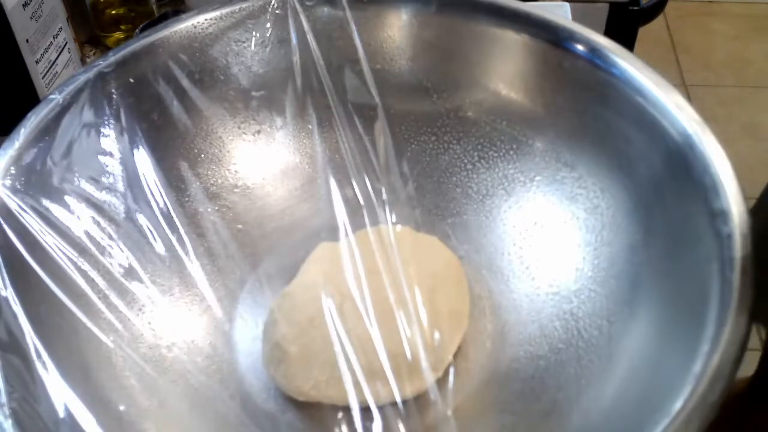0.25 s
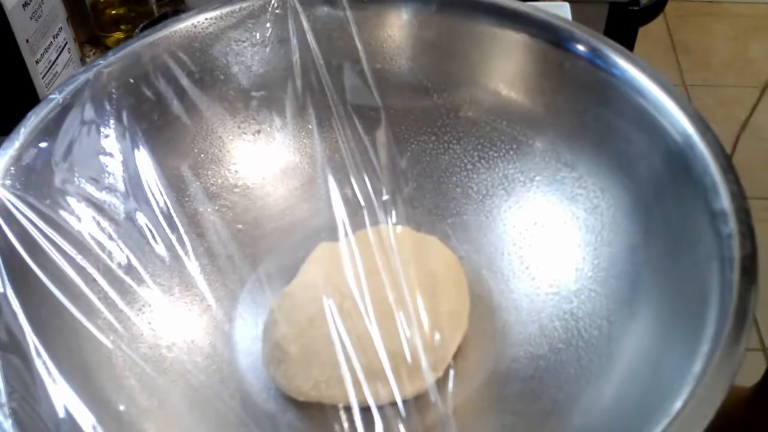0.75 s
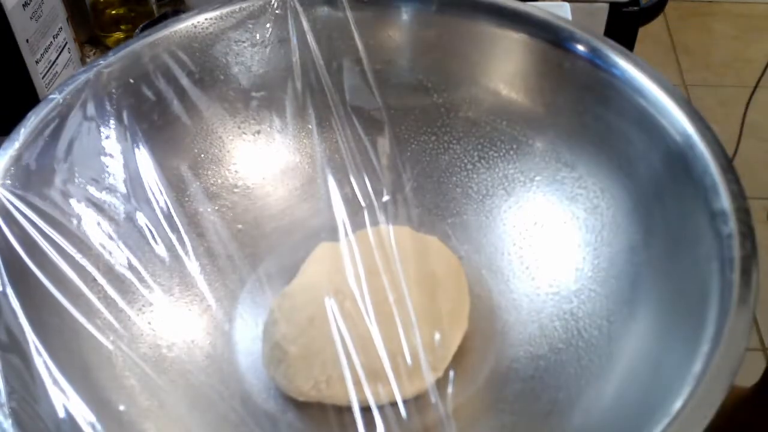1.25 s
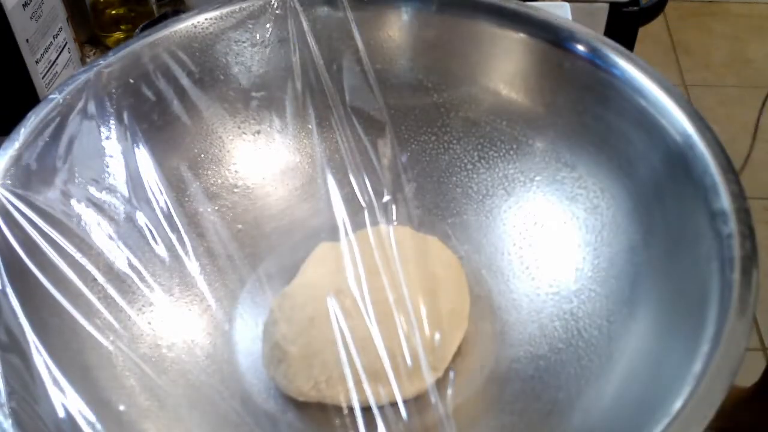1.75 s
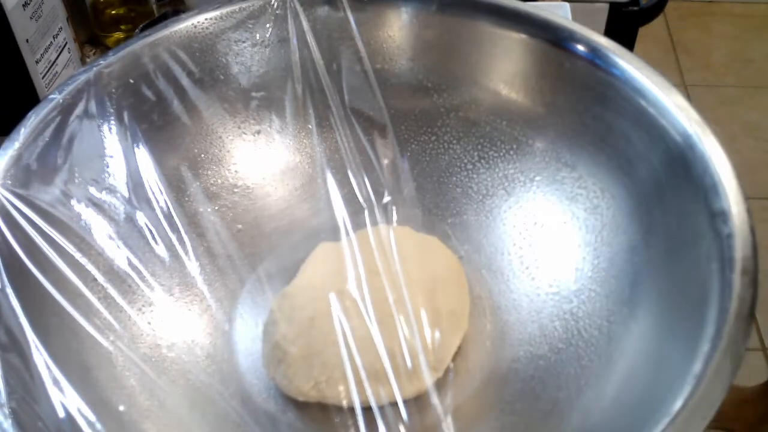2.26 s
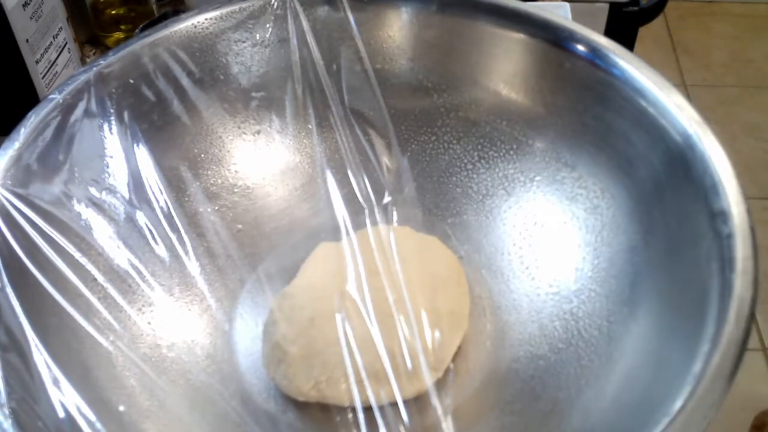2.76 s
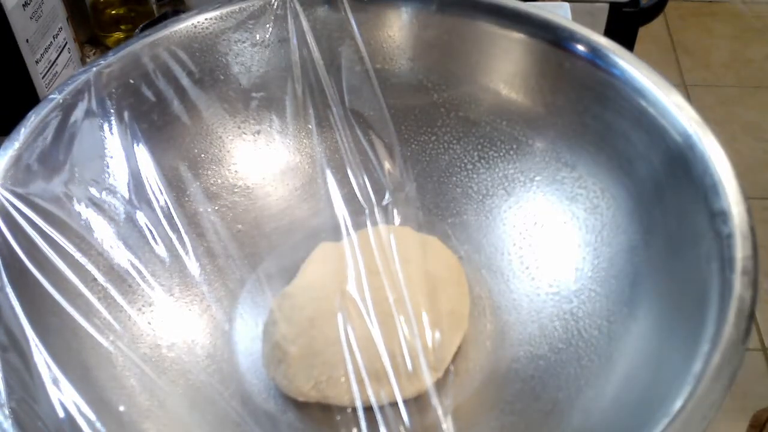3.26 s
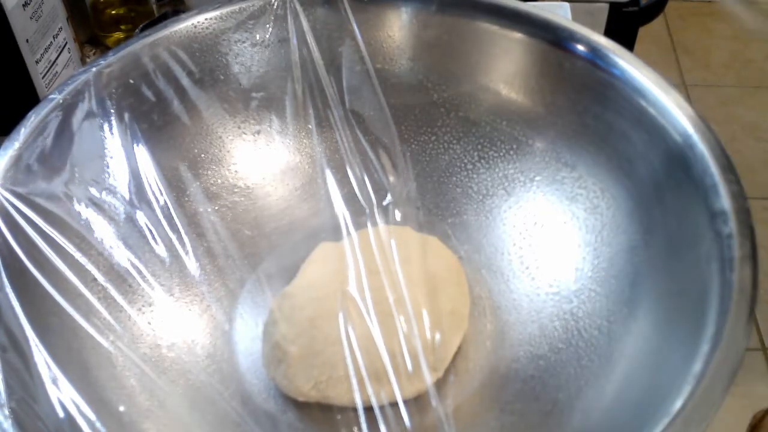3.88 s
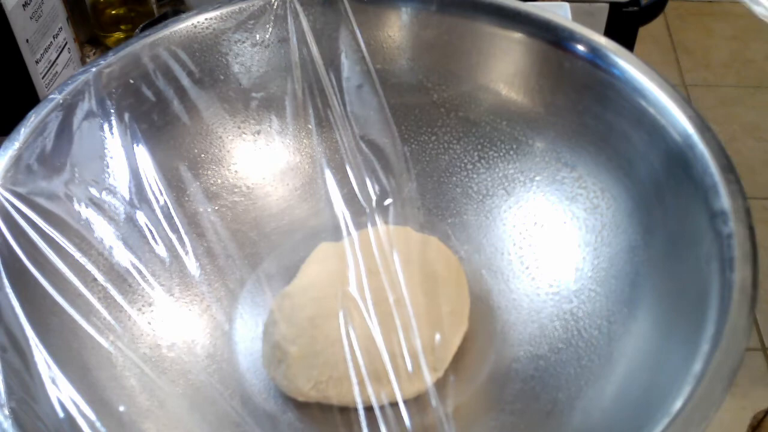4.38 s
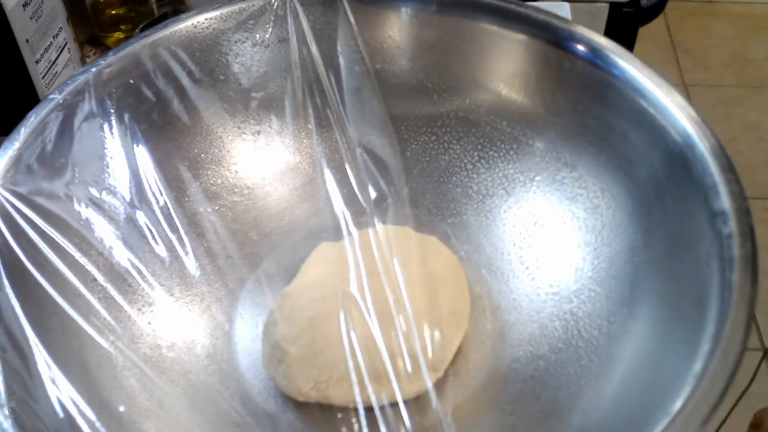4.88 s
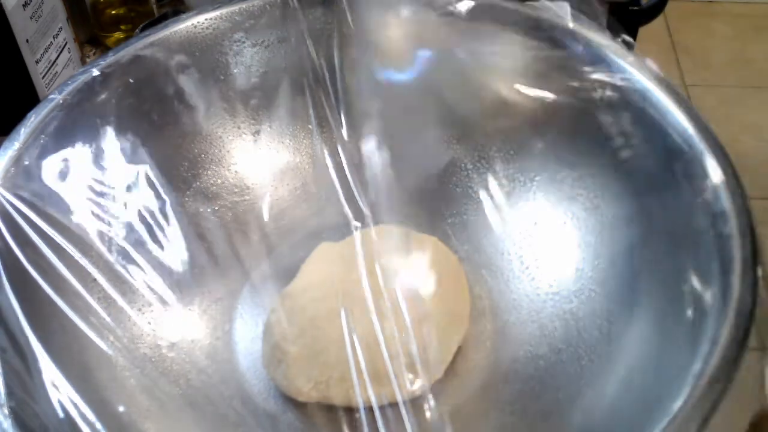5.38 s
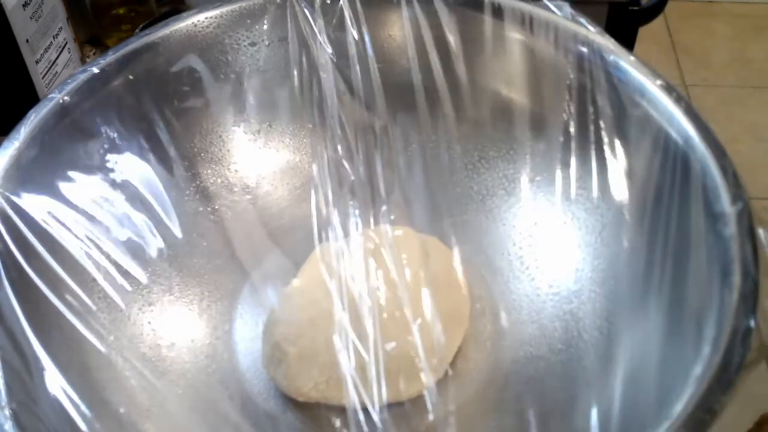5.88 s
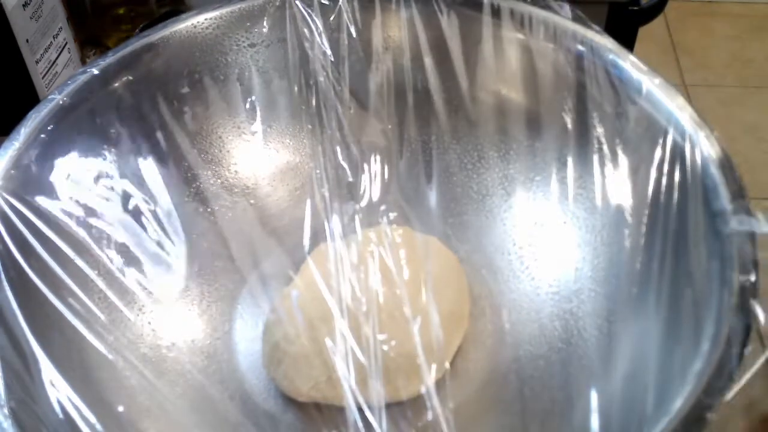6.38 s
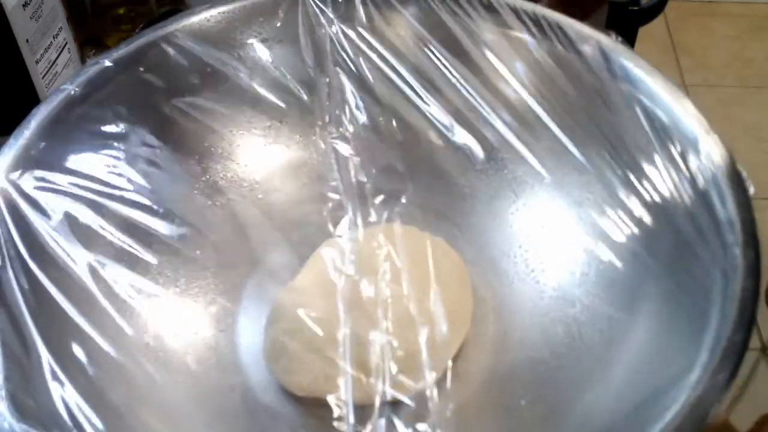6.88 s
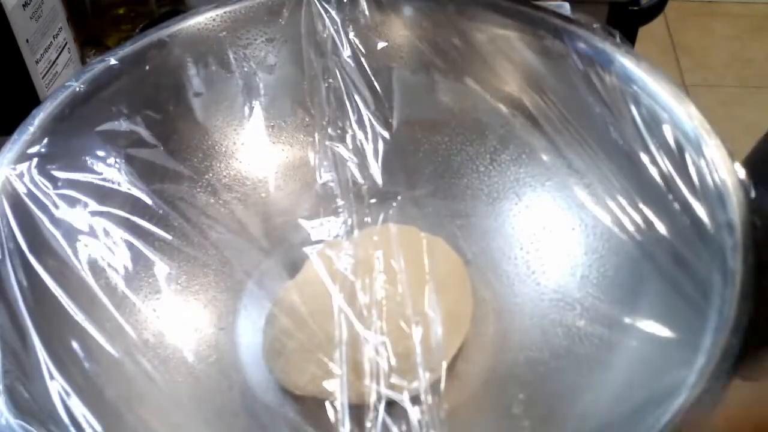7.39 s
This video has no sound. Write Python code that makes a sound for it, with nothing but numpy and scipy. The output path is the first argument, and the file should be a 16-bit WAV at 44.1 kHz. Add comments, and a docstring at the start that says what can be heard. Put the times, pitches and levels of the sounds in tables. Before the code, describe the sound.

A quiet kitchen with faint low rumble, hiss and appliance hum, heard on the left channel only, with a close microphone and a short room tail. Around 0.5 s, plastic film begins to rustle, and soft hollow finger knocks sound on the covered metal bowl until about 1.45 s. Crinkling thickens, and from 1.35 to 1.95 s sharp snaps crowd together, loudest near 1.6 and 1.8 s, with taut drumming and a slight steel ring. It thins to scattered ticks and light rustle from 2 to 3 s. Crunches and snaps return at 3.5-3.75 s and 4.15-4.35 s with bowl taps and low air flutters. Sharp isolated crackles come at 5.1 and 5.4 s, then quieter rustling and thin sliding hisses. A burst at 6.4-6.6 s leads into soft low thuds around 6.8 s. Faint crinkling continues, with a final brisk rustle from 7.45 s.

```python
"""Cling film over a steel bowl

Cling film is pulled over a steel mixing bowl in a quiet kitchen, close to a microphone on the left channel only.
The film peels off the rim in sharp snaps: clicks with flutter that ring a facet and, when taut, the steel.
Flipping folds make it rustle, crunch under the fingers and drum as a sheet; slides hiss and wafts flutter.
Finger knocks ring the modes of the covered bowl, and near the end soft bumps ring its support.
Filtered noise and narrow bands make the kitchen; one echo and a decaying tail make the room."""
import sys
import numpy as np
from scipy import signal
from scipy.fft import rfft, irfft
from scipy.io import wavfile
from scipy.ndimage import uniform_filter1d

SR = 44100
rng = np.random.default_rng(int(sys.argv[2]) if len(sys.argv) > 2 else 0)


def generate_wav(sig):
    """Save sig (samples, or channels by samples) to the path in sys.argv[1] as 16-bit PCM at SR."""
    pcm = np.round(np.clip(np.atleast_2d(sig).T, -1, 1) * 32767).astype(np.int16)
    wavfile.write(sys.argv[1], SR, pcm)


N = 336483  # samples


def undb(db):
    """Logarithmic level: decibels to amplitude gain."""
    return 10 ** (np.asarray(db) / 20)


def level(x, db):
    """Mean power: scale a sound to an rms level."""
    return x * undb(db) / np.sqrt(np.mean(x ** 2))


def add(track, s, sound):
    """Superposition: mix a sound into a track at a time in seconds."""
    i = max(int(round(s * SR)), 0)
    track[i:i + len(sound)] += sound[:max(len(track) - i, 0)]


def curve(points):
    """Linear interpolation: a control of (time [s], value) points, sample by sample."""
    return np.interp(np.arange(N) / SR, *np.transpose(points))


def response(points, size=512, tilt_db=0):
    """Minimum phase: a causal unit-energy response to a spectrum, tilted in dB an octave above 1 kHz."""
    hz, db = np.transpose(points)
    octave = np.log2(np.maximum(np.fft.rfftfreq(size, 1 / SR), 1))
    spectrum_db = np.interp(octave, np.log2(hz), db) + tilt_db * np.maximum(octave, 10)
    cepstrum = irfft(np.log(undb(spectrum_db)))
    # folding the cepstrum forward makes the response causal
    cepstrum[1:size // 2] *= 2
    cepstrum[size // 2 + 1:] = 0
    h = irfft(np.exp(rfft(cepstrum)))
    return h / np.linalg.norm(h)


def colour(x, points, size=2048):
    """Linear filtering: pass a sound through a spectrum; rms 1."""
    return level(signal.fftconvolve(x, response(points, size=size))[:N], 0)


def resonate(x, hz, width_hz):
    """Simple resonance: one second-order peak with gain 1 at its centre."""
    hz = min(hz, .4 * SR)
    return signal.lfilter(*signal.iirpeak(hz, hz / width_hz, fs=SR), x)


def band(hz, width_hz, size=N):
    """Cascaded resonance: noise passed twice through the same peak for steeper skirts; rms 1."""
    once = resonate(rng.standard_normal(size), hz, width_hz)
    return level(resonate(once, hz, width_hz), 0)


def walk(rate):
    """Random modulation: smooth wandering with a spread near 1, renewed `rate` times a second."""
    k = int(SR / rate)
    steps = np.repeat(rng.standard_normal(N // k + 1), k)
    return level(uniform_filter1d(steps, k), 0)[:N]


def fade(t60, length_s):
    """Exponential decay: the amplitude falls 60 dB in t60 seconds."""
    return np.exp(-np.log(1000) * np.arange(int(length_s * SR)) / SR / t60)


def tail(t60):
    """Diffuse reverberation: half a second of decaying noise of unit energy."""
    envelope = fade(t60, .5)
    x = envelope * rng.standard_normal(len(envelope))
    return x / np.linalg.norm(x)


def swell(length_s, rise):
    """Power envelope: a rounded hump of height 1 that peaks after the share `rise` of its length."""
    share = np.linspace(0, 1, int(length_s * SR))
    return np.sqrt(np.interp(share, [0, np.clip(rise, .01, .99), 1], [0, 1, 0]))


def ring(modes, detune):
    """Modal superposition: decaying sines of a struck object; each blow shifts the modes slightly."""
    t = np.arange(SR // 2) / SR
    out = np.zeros(len(t))
    for hz, db, t60 in modes:
        shifted_hz = hz * (1 + detune * rng.standard_normal())
        out += undb(db) * fade(t60, .5) * np.sin(2 * np.pi * shifted_hz * t)
    return out


def folds(rate, spread_db, cap_db):
    """Crackling noise: folds flip at random, many weakly and a few strongly, with even mean power."""
    size = undb(np.minimum(spread_db * rng.exponential(size=N), cap_db))
    flips = rng.random(N) < rate / SR
    x = flips * size * rng.choice([-1, 1], N)
    return x / np.sqrt(np.abs(uniform_filter1d(x ** 2, size=2600)) + 1e-9)


# spectrum of the kitchen's rumble and hiss: (frequency [Hz], relative density [dB per Hz])
KITCHEN_COLOUR = [(10, -6), (22, 0), (43, -3), (65, -5), (130, -14), (270, -18), (500, -23), (1100, -28),
                  (1800, -33), (3200, -34), (5500, -35), (10000, -34), (16000, -39)]
# appliance hum: (frequency [Hz], width of each resonance pass [Hz], level [dB])
HUM = [(99.8, 4, -90.5), (189.5, 15.3, -77.5), (252, 9.2, -82), (899, 91, -83.5)]


def kitchen(air_db=-61.5, wander_db=1):
    """Stationary noise: low rumble and faint hiss wander in level beside the narrow hum of an appliance."""
    air = colour(rng.standard_normal(N), KITCHEN_COLOUR, size=8192)
    air = air * undb(air_db + wander_db * walk(3.2))
    return air + sum(undb(db) * band(hz, width) for hz, width, db in HUM)


# the hand tugs at the sheet and it wafts air: (time [s], length [s], peak of the rms level [dB])
WAFTS = [(0.606, 0.23, -56), (3.614, 0.34, -50), (4.2, 0.26, -48.5), (5.084, 0.17, -54), (7.43, 0.14, -54)]


def wafts():
    """Air displacement: the moving sheet pushes air at the microphone, a faint low flutter."""
    push = np.zeros(N)
    for s, length_s, db in WAFTS:
        add(push, s, undb(db) * swell(length_s, rise=0.22))
    # (frequency [Hz], relative density [dB per Hz])
    low = [(15, 4.5), (40, -3), (100, -15.5), (250, -16), (800, -38)]
    return push * colour(rng.standard_normal(N), low, size=8192)


# fingers knock on the covered bowl: (time [s], rms level of the first 25 ms [dB],
# frequency around which the contact excites it most [Hz], t60 of the finger's damping [s])
KNOCKS = [(.475, -49, 560, .1), (.53, -58, 400, .2), (.665, -50.5, 270, .25), (.901, -54, 950, .1),
          (.958, -41, 290, .22), (1.012, -52, 450, .08), (1.120, -51, 300, .1), (1.143, -48.5, 480, .15),
          (1.215, -48.5, 520, .06), (1.251, -42, 520, .25), (1.320, -45.5, 240, .1), (1.452, -52, 800, .1),
          (3.732, -55, 1150, .06), (4.185, -44.5, 1100, .15), (4.208, -48, 900, .1), (4.312, -55, 320, .1),
          (4.338, -54, 320, .07), (5.202, -60, 450, .02), (6.615, -57, 1000, .12)]
# modes of the bowl under its film, before contact and damping: (frequency [Hz], relative level [dB], t60 [s])
BOWL_MODES = [(140, -9, .06), (221, 3, .3), (300, -3, .12), (445, -4, .17), (505, -3, .12), (590, -6, .05),
              (692, 0, .17), (930, 1, .1), (1020, -4, .08), (1290, -9, .08)]
# soft bumps of the bowl on its support: (time [s], peak level [dB])
BUMPS = [(6.64, -40.5), (6.764, -28.5), (6.8137, -30), (6.868, -45)]
# modes of the support, before the band limit: (frequency [Hz], relative level [dB], t60 [s])
SUPPORT_MODES = [(103, 9, 0.032), (108.3, -11.5, 0.5), (200, 2, 0.056), (224, -22.5, 0.42),
                 (318, -3.5, 0.017), (437, -5, 0.037)]


def bowl(reach_db=7, scuff_db=-8, scuff_t60=0.057, bump_cut_hz=520):
    """Modal excitation: knocks ring the bowl most near their own pitch, scuffed and damped by the finger;
    bumps thud in its support."""
    out = np.zeros(N)
    # a soft fingertip takes a few ms to press in
    press = 1 - fade(.012, .5)
    for s, db, contact_hz, damping_t60 in KNOCKS:
        # modes weaken with the square of their distance from the contact in octaves
        excited = [(hz, gain - reach_db * np.log2(hz / contact_hz) ** 2, t60) for hz, gain, t60 in BOWL_MODES]
        knock = ring(excited, detune=.01)
        scuff = band(contact_hz, 0.68 * contact_hz, size=len(knock)) * fade(scuff_t60, .5)
        knock = (level(knock, 0) + level(scuff, scuff_db)) * press * fade(damping_t60, .5)
        add(out, s, undb(db) * knock / knock[:int(.025 * SR)].std())
    soft = signal.butter(4, [80, bump_cut_hz], "bandpass", fs=SR, output="sos")
    for s, db in BUMPS:
        thud = signal.sosfilt(soft, ring(SUPPORT_MODES, detune=.01))
        add(out, s, -undb(db) * thud / np.abs(thud).max())
    return out


# film sliding over the rim with a thin swish:
# (time [s], length [s], level at the hump before flicker [dB], centre frequency [Hz])
SLIDES = [(1.976, 0.27, -69, 1710), (3.151, .21, -72, 2330), (3.534, .29, -63.5, 2100),
          (5.237, .14, -69, 2530), (5.614, .15, -71, 2530), (5.807, 0.3, -71, 2670),
          (6.167, 0.19, -71, 2560), (6.543, 0.17, -67, 900), (6.965, .09, -71, 3740),
          (7.442, .19, -69, 2780), (7.433, 0.16, -68, 920)]


def slides(width_hz=700):
    """Friction noise: film dragged across steel hisses in a narrow band that flickers in level."""
    drag = np.zeros(N)
    for s, length_s, db, hz in SLIDES:
        hump = swell(length_s, rise=0.41)
        add(drag, s, undb(db) * hump * band(hz, min(width_hz, hz / 3), size=len(hump)))
    return drag * undb(2.5 * walk(120))


# spectrum of the crinkling: (frequency [Hz], relative density [dB per Hz])
CRINKLE_COLOUR = [(300, -30.5), (1000, -5.5), (1700, -16), (2800, -7), (4500, -7.5), (6500, -5.5),
                  (8400, -1.5), (11000, -1), (12800, -5), (14200, -10), (16000, -28)]


def crinkle(clicks, facet_width_hz=650):
    """Buckling: broad clicks with a short flutter, plus facets of many sizes that flip and take turns."""
    power = signal.fftconvolve(clicks ** 2, fade(.004, .01))[:N]
    flutter = level(np.sqrt(np.abs(power)) * rng.standard_normal(N), 0)
    broad = level(clicks + .7 * flutter, 0)
    facets = np.zeros(N)
    for hz in np.linspace(2000, 14500, 16):
        flips = folds(rate=150, spread_db=4, cap_db=18) * undb(3.5 * walk(16))
        facets += resonate(flips, hz * (1 + 0.012 * rng.standard_normal()), facet_width_hz)
    return colour(broad + level(facets, 0), CRINKLE_COLOUR)


# how hard the hands work the film: (time [s], level of its steady crinkling [dB])
HANDLING = [(0, -86), (.43, -83), (.66, -61.5), (1.1, -54.5), (1.57, -53.5), (1.82, -50.5), (2.15, -60),
            (2.64, -59), (2.82, -78.5), (3.2, -59), (3.46, -74), (3.68, -56.5), (4.0, -63), (4.3, -57),
            (4.6, -72), (5.04, -77), (5.18, -61), (5.8, -66), (6.17, -66.5), (6.6, -58), (6.88, -71.5),
            (7.22, -64.5), (7.33, -92), (7.43, -104), (7.46, -48), (7.63, -59.5)]
# handfuls of folds giving way under the fingers:
# (time [s], length [s], peak crinkle level [dB], peak sheet level before tautness [dB])
CRUNCHES = [(0.491, 0.12, -57.5, -57), (0.639, 0.076, -56.5, -56.5), (0.745, 0.1, -59.5, -56.5),
            (0.959, 0.064, -50, -53), (1.068, .11, -52, -55.5), (1.199, 0.073, -44, -49),
            (1.27, .08, -68, -55.5), (1.377, 0.083, -47, -54.5), (1.452, 0.024, -39.5, -56),
            (1.602, .11, -55, -55.5), (1.777, 0.18, -62, -55.5), (2.312, .04, -54, -77),
            (2.377, 0.1, -55, -80), (3.145, 0.34, -59.5, -62), (3.406, 0.037, -52.5, -89),
            (3.5, 0.14, -58, -67), (3.615, 0.056, -41.5, -50.5), (3.709, 0.056, -45.5, -54.5),
            (3.894, 0.043, -54, -70), (4.161, 0.091, -42.5, -49.5), (4.318, 0.1, -53.5, -67),
            (5.08, 0.14, -59.5, -67.5), (5.164, 0.015, -40.5, -72), (5.404, 0.019, -46.5, -62),
            (5.52, 0.093, -58, -81), (5.979, 0.093, -57, -87), (6.22, 0.093, -53, -64),
            (6.414, 0.085, -51.5, -67), (6.559, 0.042, -48, -61), (6.597, 0.049, -43, -57),
            (6.783, 0.054, -57, -57.5), (6.972, 0.05, -58.5, -69), (7.172, 0.12, -66.5, -71.5),
            (7.438, 0.024, -50.5, -56.5), (7.485, 0.046, -48, -73), (7.592, .02, -52, -65)]
# spectrum of the drumming sheet: (frequency [Hz], relative density [dB per Hz])
SHEET_COLOUR = [(40, -10), (120, -0.5), (250, 5.5), (420, 0.5), (650, 0), (790, -5.5), (950, -1),
                (1300, -7), (1650, -11), (2200, -10.5), (4000, -22), (9000, -79)]
# how taut the film is while it is pulled: (time [s], tautness [0-1])
TAUT = [(0, 0.2), (1.5, 0.1), (1.65, 0.1), (1.8, 0.9), (1.95, 0.7), (2.3, 0.03), (7.63, 0)]


def film(crunch_rise=0.24, sheet_below_crinkle_db=7.5, taut_drum_db=3):
    """Membrane radiation: folds crinkle in the treble and shake the stretched sheet; crunches crowd them."""
    work_db = curve(HANDLING)
    press, shake = np.zeros(N), np.zeros(N)
    for start, length_s, top_db, body_db in CRUNCHES:
        hump = swell(length_s, rise=crunch_rise)
        add(press, start, undb(top_db) * hump)
        add(shake, start, undb(body_db) * hump)
    clicks = folds(rate=800, spread_db=4.8, cap_db=21)
    treble = crinkle(clicks) * np.hypot(undb(work_db), press)
    # the stretched sheet answers in bass and middle, and evens out the single clicks
    drumming = colour(folds(rate=1500, spread_db=3, cap_db=10), SHEET_COLOUR)
    steady = undb(work_db - sheet_below_crinkle_db)
    # a taut sheet drums louder
    sheet = drumming * np.hypot(steady, shake) * undb(taut_drum_db * curve(TAUT))
    return treble + sheet


# the film peels along the rim in runs of small snaps: (time [s], length [s], typical energy of a snap [dB])
PEELS = [(1.372, 0.09, -22), (1.84, .05, -19), (1.95, 0.074, -24.5), (2.197, 0.045, -31.5),
         (3.004, .06, -30), (3.514, 0.12, -24.5), (3.311, 0.038, -30.5), (6.569, 0.056, -22)]


def slips(flutter=0.45, gap_s=.021, gap_scatter=.4, spread_db=4, tilt_db=0.9):
    """Stick and slip: each peel is a run of small snaps at uneven gaps; rows as in SNAPS."""
    rows = []
    for start, length_s, db in PEELS:
        pace, strength, bright = rng.standard_normal((3, 16))
        gaps = gap_s * np.exp(gap_scatter * pace)
        for s, k, b in zip(np.cumsum(gaps) - gaps[0], strength, bright):
            if s < length_s:
                rows.append((start + s, db + spread_db * k, flutter, tilt_db * b))
    return rows


# the loud or lone snaps of the film: (time [s], energy [dB],
# share of the push's energy in the flutter after the click [0-1, held to .05-.95], brightness [dB an octave])
SNAPS = [(.475, -31.5, .8, -3), (0.6453, -27.5, .3, -2), (0.9019, -17.5, 0.6, 0.5), (1.153, -15, 0.1, 5),
         (1.248, -14, .85, .3), (1.3594, -10, 0.16, 0.7), (1.406, -13.5, .1, 2), (1.453, -17, 0.5, -1),
         (1.472, -17, 0, 0), (1.6111, -6.5, .5, -1.6), (1.6531, -14, 0.5, -1), (1.666, -16, 0.3, -1),
         (1.679, -13.5, 0.1, -1), (1.6932, -9, 0.2, -1), (1.7096, -10, 0.2, -1.3), (1.7595, -12.5, 0.2, .2),
         (1.7798, -2, 0.16, -0.5), (1.7981, -18, .1, .4), (1.8093, -9.5, 0.42, -0.5), (1.8278, -9.5, 0, .6),
         (1.8602, -13, .2, 2), (1.8813, -16.5, 0.1, -0.5), (1.9004, -16, 0.1, -3.5),
         (1.9266, -10, 0.42, -1), (2.3213, -21, 0.2, -2.2), (2.4065, -21.5, 0.3, 4), (3.044, -29, .5, 1.5),
         (3.4935, -19, 0.14, 1.2), (3.593, -17.5, .3, 2), (3.601, -16.5, 0.51, -1.2),
         (3.6229, -6.5, .8, 0.5), (3.732, -10, .6, -.7), (4.1, -17.5, .4, 1.5), (4.154, -28, .3, 5),
         (4.1612, -12, .8, .9), (4.188, -11, 0.8, 1), (4.2066, -23, .6, -1.7), (4.234, -23, 0.4, -5),
         (4.3436, -28, .4, -4), (4.7598, -23.5, 0.15, -1.5), (4.8371, -25.5, 0.2, -1.5),
         (5.0664, -12.5, 0.2, 0.8), (5.1586, -22, .4, 1), (5.1631, -14.5, .5, 0.5), (5.168, -19.5, 0.75, 0),
         (5.4141, -13.5, 0.55, .2), (6.467, -19, .4, 0.7), (6.495, -19.5, .4, 2), (6.5224, -21, .4, 0),
         (6.6056, -14, 0.65, -.1)]
# spectrum of a snap before its brightness: (frequency [Hz], relative density [dB per Hz])
SNAP_COLOUR = [(100, -21.5), (500, -9.5), (950, -9.5), (1500, -13), (2400, -12), (3500, -9), (5800, -4),
               (6800, -4.5), (8500, -2), (11300, 1.5), (13000, -0.5), (15500, -16)]
# the steel rim, shaken by snaps through the taut film:
# (frequency [Hz], width of each resonance pass [Hz], relative level [dB], t60 [s])
RIM = [(1040, 160, -25, .25), (1640, 260, -24, .35), (4500, 500, -21, .12), (5750, 800, -14, .15)]


def snaps(facet_hz=9270, facet_db=3, facet_width_hz=700, rim_db=1.5):
    """Impulsive release: film letting go of the rim clicks, flutters a few ms and rings the flipped facet."""
    out = np.zeros(N)
    chance = rng.standard_normal((160, 1024))
    for (s, db, share, tilt_db), (facet, *noise) in zip(SNAPS + slips(), chance):
        share = np.clip(share, .05, .95)
        flutter = fade(.008, .02)
        flutter = flutter * noise[:len(flutter)]
        push = np.sqrt(share) * flutter / np.linalg.norm(flutter)
        push[0] += np.sqrt(1 - share)  # the click
        snap = signal.fftconvolve(push, response(SNAP_COLOUR, tilt_db=tilt_db))
        snap = snap + undb(facet_db) * resonate(snap, facet_hz * np.exp(0.12 * facet), facet_width_hz)
        add(out, s, undb(db) * snap / np.linalg.norm(snap))
    # a taut film passes the jolt on to the steel, whose modes lie in close clusters
    jolt = out * curve(TAUT) * undb(rim_db)
    steel = 0
    for hz, width, db, t60 in RIM:
        cluster = resonate(resonate(tail(t60), hz, width), hz, width)
        # make up for the energy a narrow band loses
        steel = steel + undb(db) * np.sqrt(SR / width / 2) * cluster
    return out + signal.fftconvolve(jolt, steel)[:N]


def scene(echo_s=.0059, echo_db=-19.5, room_t60_s=0.32, room_db=-11.5):
    """Early and late reflection: the handling, one echo from a nearby surface, a short room tail, the kitchen."""
    direct = snaps() + film() + slides() + bowl()
    out = direct + wafts() + kitchen()
    add(out, echo_s, undb(echo_db) * direct)
    room = signal.fftconvolve(direct, tail(room_t60_s))[:N]
    add(out, echo_s, undb(room_db) * room)
    return np.array([out, np.zeros(N)])


def record(dry, top_hz=16000, offset=.0077):
    """Band limiting: the top is cut steeply; only the left input is live, and it sits slightly off zero."""
    top_cut = signal.ellip(8, .2, 70, top_hz, fs=SR, output="sos")
    return signal.sosfilt(top_cut, dry) + np.array([[offset], [0]])


dry = scene()
out = record(dry)
generate_wav(out)
```